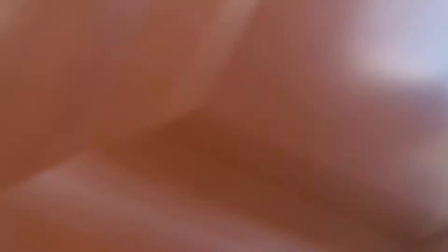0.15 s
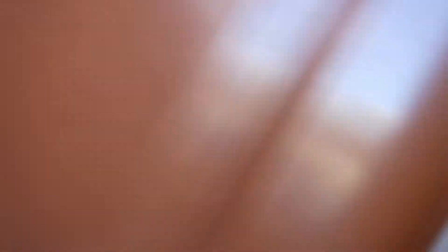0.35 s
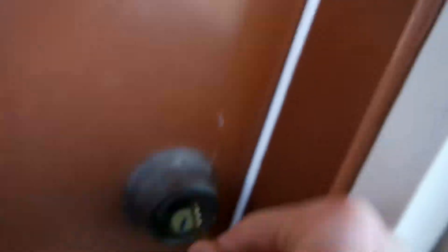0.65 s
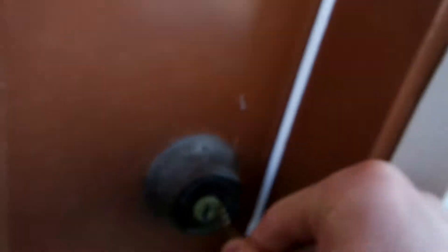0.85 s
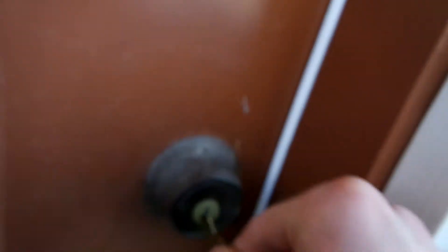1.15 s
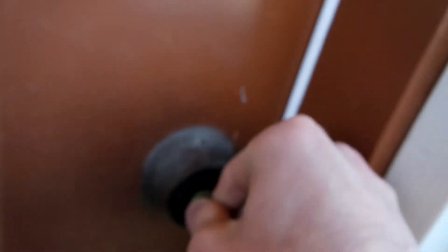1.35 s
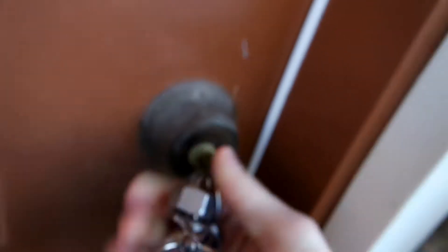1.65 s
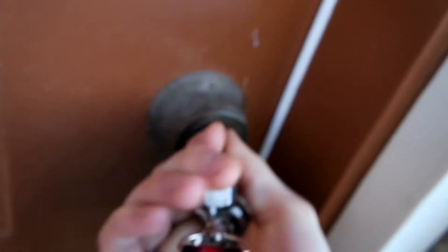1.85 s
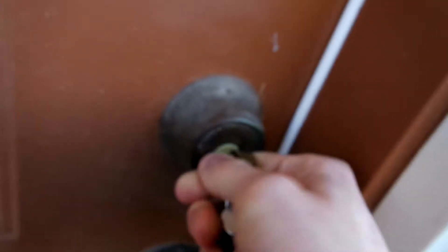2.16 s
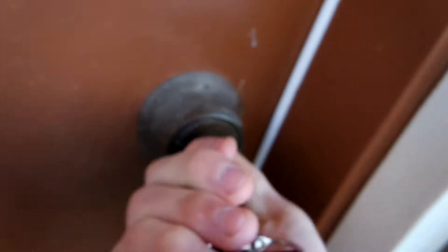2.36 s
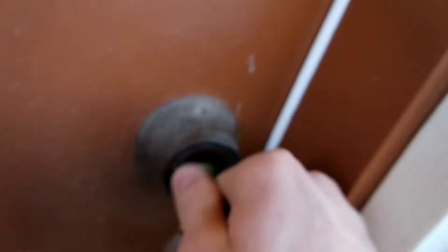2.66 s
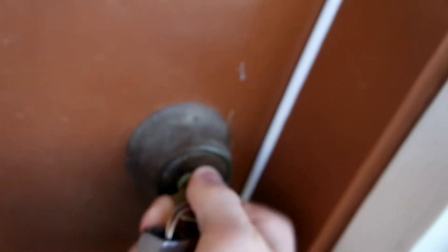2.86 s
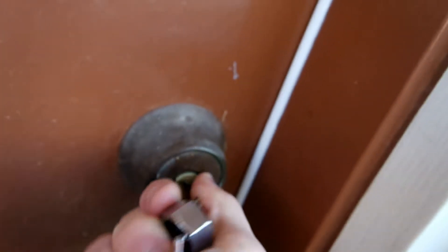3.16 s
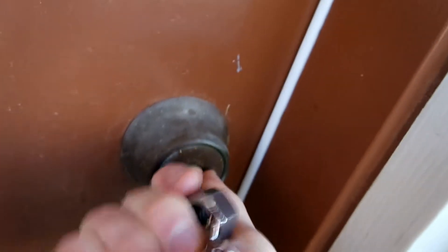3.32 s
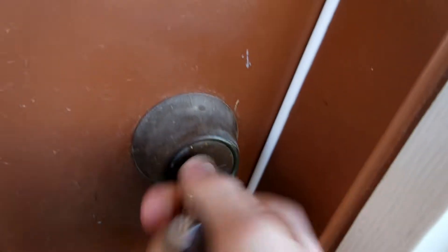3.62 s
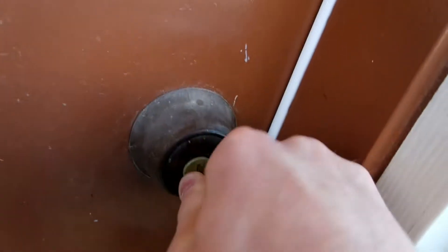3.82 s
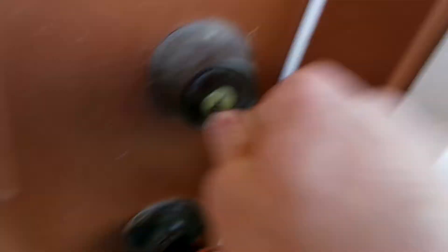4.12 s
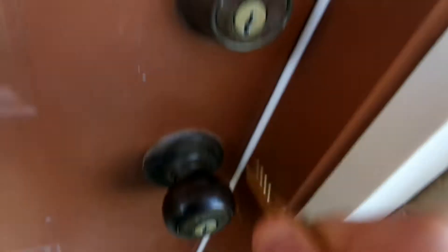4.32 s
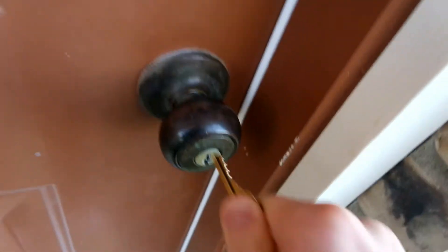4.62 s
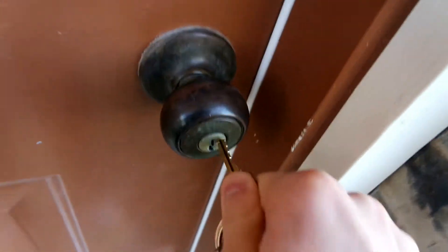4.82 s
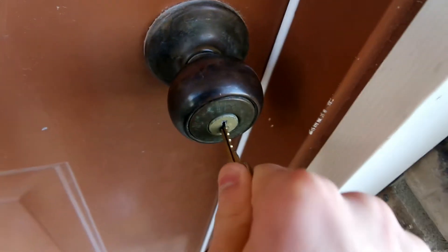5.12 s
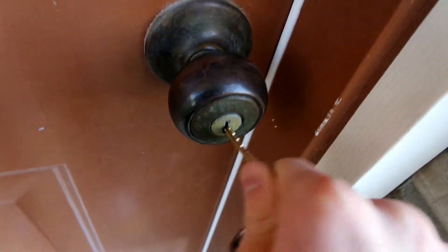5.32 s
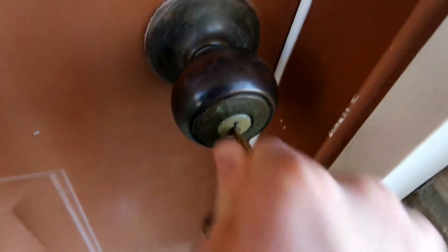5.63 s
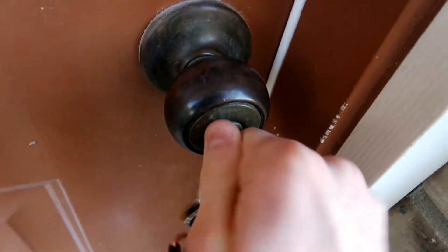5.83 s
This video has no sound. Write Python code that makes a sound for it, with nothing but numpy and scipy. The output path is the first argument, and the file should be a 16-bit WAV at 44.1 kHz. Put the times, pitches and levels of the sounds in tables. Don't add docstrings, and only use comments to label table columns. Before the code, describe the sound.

Close metallic clicking of a key worked in and out of a wooden door's lock, loose keys clinking, then a second key insertion below.

```python
import sys
import numpy as np
from scipy import signal
from scipy.fft import rfft, irfft, next_fast_len
from scipy.io import wavfile
from scipy.ndimage import uniform_filter1d

SR = 44100
rng = np.random.default_rng(int(sys.argv[2]) if len(sys.argv) > 2 else 0)


def field_ratio(decibels):
    return 10 ** (np.asarray(decibels, dtype=float) / 20)


def dump_mix(stems):
    frames = np.atleast_2d(stems).T
    limited = np.clip(frames, -1, 1)
    pcm = np.round(limited * 32767).astype(np.int16)
    wavfile.write(sys.argv[1], SR, pcm)


N = 263718

# start_s [s], peak_db [dB], pitch_hz [Hz]
THUDS = [(1.04, -27, 150), (1.224, -24, 140), (1.232, -22, 260), (1.242, -23, 400), (1.437, -14.5, 129),
         (2.082, -22, 88), (4.045, -12.5, 148), (4.1915, -12, 75), (4.399, -25, 59.3), (4.7, -21.5, 110),
         (4.729, -24, 70.7), (4.918, -18, 101.5), (5.153, -20.5, 84), (5.177, -23.5, 80),
         (5.211, -15.5, 85), (5.237, -20, 109.4), (5.368, -14.5, 130), (5.715, -16.5, 130)]
# time_s [s], level_db [dB]
FINGERS = [(0.0, -41), (0.51, -46), (0.85, -55.5), (1.13, -59.5), (1.32, -58), (1.73, -48.5), (1.86, -52.5),
           (2.41, -51.5), (2.81, -50), (2.9, -41), (3.01, -65), (3.16, -63.5), (3.78, -54.5), (4.31, -59),
           (5.7, -57.5), (5.98, -65.5)]
# mode_hz [Hz], width_hz [Hz], level_db [dB]
DOOR_MODES = [(140, 96, 0), (255, 93, 2.5), (413, 130, -0.5), (604, 156, -1.5), (805, 303, -9)]


def unit(x):
    return x / np.sqrt(np.mean(x ** 2) + 1e-20)


def along(points, hz):
    f, v = np.transpose(points)
    return np.interp(np.log(hz + 1), np.log(f + 1), v)


def curve(points):
    s, value = np.transpose(points)
    return np.interp(np.arange(N) / SR, s, value)


def wobble(rate_hz):
    knots = rng.standard_normal(int(N * rate_hz / SR) + 2)
    return np.interp(np.arange(N) * rate_hz / SR, np.arange(len(knots)), knots)


def filtered(x, response):
    m = next_fast_len(len(x) + 2048)
    spectrum = rfft(x, m) * response(np.fft.rfftfreq(m, 1 / SR))
    return irfft(spectrum, m)[:len(x)]


def resonance(f, hz, width_hz):
    return 1j * f * width_hz / (hz * hz - f * f + 1j * f * width_hz)


def modes(f, table):
    total = 0
    for k, (hz, width_hz, db) in enumerate(table):
        total = total + (-1) ** k * field_ratio(db) * resonance(f, hz, width_hz)
    return total


def tint(spectrum):
    return lambda hz: field_ratio(along(spectrum, hz))


def hiss(response, grit_db):
    grains = rng.standard_normal(N) * field_ratio(grit_db * wobble(350))
    return unit(filtered(grains, response))


def add(track, start_s, sound, peak_db):
    part = track[max(round(start_s * SR), 0):][:len(sound)]
    part += field_ratio(peak_db) * sound[:len(part)] / np.abs(sound).max()


def contact(t60_s, spike):
    t = np.arange(SR // 12) / SR
    bounce_db = 3.3 * np.repeat(rng.standard_normal(len(t) // 64 + 1), 64)[:len(t)]
    envelope = field_ratio(bounce_db - 60 * t / max(t60_s, 0.003)) * (1 - np.exp(-t / 0.00031))
    chatter = rng.standard_normal(len(t)) * envelope
    chatter[4] += spike
    return chatter


def background():
    # time_s [s], level_db [dB]
    grip = [(0.0, -56), (0.01, -37), (0.98, -40), (1.46, -32), (1.58, -39.5), (1.83, -33), (3.01, -31),
            (3.08, -43), (3.98, -30.5), (4.21, -28.5), (4.28, -39), (4.58, -37), (4.71, -32), (5.08, -32.5),
            (5.21, -33.5), (5.33, -41), (5.36, -27.5), (5.98, -40.5)]
    # freq_hz [Hz], density_db [dB per Hz]
    rumble_spectrum = [(10, -36), (18, -2), (35, 0), (80, -1.5), (130, -7), (250, -16.5), (330, -29.5),
                       (500, -66)]
    # freq_hz [Hz], density_db [dB per Hz]
    hall_spectrum = [(90, -34), (150, -8), (260, -0.5), (345, -9), (550, -6.5), (800, -12), (1200, -12.5),
                     (1850, -25), (4000, -34), (8500, -37), (15200, -41)]
    jolt_db, jolt_width_s, jolt_lag_s = -17.5, 0.014, 0.021
    t = np.arange(N) / SR
    grip_db = curve(grip)
    rumble_level = field_ratio(grip_db - 0.5 + 1.9 * wobble(22))
    for s, db, _ in THUDS:
        rumble_level += field_ratio(db + jolt_db) * np.exp(-((t - s - jolt_lag_s) / jolt_width_s) ** 2)
    rumble = rumble_level * hiss(tint(rumble_spectrum), grit_db=1.6)
    air_db = -15 + 0.51 * grip_db + 0.25 * curve(FINGERS)
    air = field_ratio(air_db + 0.61 * wobble(8)) * hiss(tint(hall_spectrum), grit_db=0.3)
    return rumble + air


def friction():
    # start_s [s], top_s [s], end_s [s], level_db [dB]
    shuffles = [
        (.01, 0.052, 0.1, -35.5),
        (0.252, .35, 0.82, -53),
        (0.505, 0.579, 0.64, -34.5),
        (0.635, 0.667, .75, -44),
        (4.44, 4.515, 4.56, -55.5),
    ]
    # start_s [s], top_s [s], end_s [s], level_db [dB]
    twists = [(1.33, 1.43, 1.485, -32), (1.61, 1.623, 1.675, -36.5), (1.668, 1.765, 1.77, -43),
              (1.82, 1.861, 1.95, -49), (2.0, 2.038, 1.96, -43), (2.07, 2.098, 2.23, -50.5),
              (2.296, 2.417, 2.36, -45.5), (2.562, 2.6, 2.72, -38), (3.424, 3.432, 3.475, -36.5),
              (3.58, 3.672, 3.8, -61), (3.693, 3.738, 3.87, -50), (3.8, 3.847, 3.95, -50),
              (4.042, 4.054, 4.1, -26), (4.071, 4.096, 4.05, -33.5), (4.191, 4.211, 4.28, -29),
              (5.64, 5.736, 5.72, -37.5), (2.368, 2.4, 2.43, -47), (2.02, 2.034, 2.05, -43)]
    # start_s [s], top_s [s], end_s [s], level_db [dB], door_db [dB]
    grinds = [
        (1.214, 1.236, 1.316, -43.5, -28.5),
        (1.273, 1.28, 1.39, -48, -40),
        (2.74, 2.76, 2.85, -49, -39),
        (2.8, 2.864, 2.87, -42.5, -39),
        (5.052, 5.123, 5.32, -65, -43.5),
        (5.439, 5.45, 5.52, -75, -34),
        (5.603, 5.74, 5.42, -32, -32),
        (5.96, 5.967, 6.25, -30, -28),
    ]
    # freq_hz [Hz], density_db [dB per Hz]
    skin_spectrum = [(880, -43), (1500, -15), (3450, -9), (5390, -5), (7710, -6.5), (8750, -3),
                     (12500, -4.5), (14100, 0.5), (15200, 0.5)]
    # freq_hz [Hz], density_db [dB per Hz]
    blade_spectrum = [(500, -40), (900, -12.5), (1400, 0), (2000, -3), (3000, -5), (4500, -8.5),
                      (6500, -20), (15000, -33)]
    shuffle_db, twist_db, grind_skin_db = np.array([2.5, -14.5, -20]), np.array([1, -1, 2.6]), -16

    strokes = [(*when, db + shuffle_db) for *when, db in shuffles]
    strokes += [(*when, db + twist_db) for *when, db in twists]
    strokes += [(*when, [db + grind_skin_db, db, door_db]) for *when, db, door_db in grinds]

    fingers_db = curve(FINGERS)
    effort = np.array([field_ratio(fingers_db - 3.5), field_ratio(0.64 * fingers_db - 24), np.zeros(N)])
    slips = field_ratio(2.64 * wobble(130))
    for start_s, top_s, end_s, db in strokes:
        span = np.arange(round(start_s * SR), min(round(end_s * SR), N))
        swell = np.interp(span / SR, [start_s, top_s, end_s], [0, 1, 0]) ** 1.07
        effort[:, span] += field_ratio(db)[:, None] * swell * slips[span]
    skin = hiss(tint(skin_spectrum), grit_db=3.5)
    blade = hiss(tint(blade_spectrum), grit_db=2.5)
    door = hiss(lambda f: modes(f, DOOR_MODES), grit_db=1.5)
    return np.sum(effort * [skin, blade, door], axis=0)


def ticks():
    # start_s [s], peak_db [dB], brightest_hz [Hz]
    approach = [(0.0194, -30, 14700), (0.058, -11, 14700), (0.0907, -19.5, 13700), (0.1264, -23.5, 10900),
                (0.2449, -13, 6130), (0.2907, -21, 14600), (0.3037, -22, 14900), (0.3282, -24, 14900),
                (0.347, -22, 14400), (0.383, -21, 13200), (0.7881, -17, 7550), (0.9218, -36.5, 5000),
                (1.0366, -33, 5000), (1.0615, -27, 6300), (1.1757, -40, 8620), (1.2381, -34, 6840),
                (1.282, -27, 6060)]
    # start_s [s], peak_db [dB], brightest_hz [Hz]
    turning = [(1.6126, -25, 8200), (1.6818, -20, 13200), (1.733, -25, 12300), (1.7496, -14, 15200),
               (1.7727, -24, 6750), (1.8392, -30, 13500), (1.8656, -25.5, 5200), (1.9061, -26, 11600),
               (1.977, -27, 6630), (2.0058, -22, 14800), (2.03, -21, 14700), (2.077, -30, 14200),
               (2.0877, -21.5, 11600), (2.1064, -26, 10000), (2.1435, -31, 14500), (2.2847, -42, 14700),
               (2.342, -30, 14700), (2.3765, -34, 14900), (2.386, -20, 14700), (2.5187, -34, 12100)]
    # start_s [s], peak_db [dB], brightest_hz [Hz]
    throwing = [(2.581, -8, 15800), (2.611, -21, 10200), (2.6529, -19, 14600), (2.6788, -18.5, 5030),
                (2.7443, -29, 5170), (2.764, -24, 12100), (2.8193, -18, 12200), (2.8828, -36, 14900),
                (2.9013, -22, 14700), (2.9204, -24, 13100), (2.9456, -14, 7800), (2.981, -28, 13500),
                (3.0128, -10.5, 5100), (3.057, -42, 11800), (3.268, -19, 6440), (3.4236, -4, 11200),
                (3.5743, -25, 13800), (3.7083, -31, 6500), (3.7165, -27, 11000), (3.7449, -16, 13600),
                (3.7824, -28, 12500), (3.8034, -22, 12800), (3.8302, -27, 14000), (3.838, -18.5, 13800),
                (3.9394, -31, 12200)]
    # start_s [s], peak_db [dB], brightest_hz [Hz]
    leaving = [(4.337, -35, 8790), (4.47, -30.5, 14100), (4.519, -34, 11300), (4.6096, -31, 9700),
               (4.63, -32, 14300), (4.9278, -43, 5310), (5.1272, -30.5, 5130), (5.4286, -33, 13700),
               (5.448, -20.5, 12200), (5.4574, -31, 14100), (5.5154, -41, 14000), (5.5544, -31, 11300),
               (5.823, -46, 9000), (5.839, -42, 14000), (5.858, -48, 10000), (5.949, -43, 9000),
               (5.904, -36, 11300), (5.9194, -38, 13500), (5.9618, -4, 11200)]
    # start_s [s], peak_db [dB]
    pins = [(1.2451, -25), (1.2682, -20), (1.3462, -25), (1.3611, -9.5), (1.372, -24), (1.3826, -20),
            (1.3857, -11), (1.4042, -17), (1.4075, -15), (1.4388, -13), (1.4242, -11), (1.4412, -9),
            (4.0475, -10), (4.0542, -2), (4.0894, -11.5), (4.1969, -13), (4.204, -11), (4.2138, -6),
            (4.2255, -10), (4.2362, -8), (4.2474, -4), (5.655, -22), (5.6765, -16), (5.6884, -24),
            (5.7004, -15), (5.7107, -17), (5.7214, -22), (5.7285, -19), (5.733, -21), (5.74, -18),
            (5.7482, -14), (5.753, -17), (5.7615, -11)]
    pin_hz, pin_low_hz, tick_t60_s = 12880, 4700, 0.016

    hits = [(s, db, hz, 0) for s, db, hz in approach + turning + throwing + leaving]
    for s, db in pins:
        low = 1.4 if s > 5 else 0
        hits.append((s, db, pin_hz * (1 + 0.044 * rng.standard_normal()), low))

    out = np.zeros(N)
    for s, db, hz, low in hits:
        def colour(f):
            part = resonance(f, hz, 1800) + low * resonance(f, pin_low_hz, 1260)
            port = 0.5 * resonance(f, 14700, 1100)
            wide = 0.29 * resonance(f, 9000, 14000)
            return (part + port + wide) * resonance(f, 11300, 17600)

        t60_s = tick_t60_s * (1 + max(db + 11.5, 0) / 30)
        add(out, s + 0.0004, filtered(contact(t60_s, spike=3.6), colour), db + 3.2)
    return out


def knocks():
    # start_s [s], peak_db [dB], loudest_hz [Hz], panel_db [dB]
    bolt = [(0.788, -36, 1010, -24), (0.922, -33.5, 1150, -41), (1.038, -20, 1880, -20.5),
            (1.062, -13.5, 1820, -21), (1.176, -28.5, 1660, -37), (1.224, -31, 1210, -27),
            (1.285, -14.5, 1870, -28), (1.337, -22.5, 1750, -26), (1.4415, -11, 1880, -16.5),
            (1.895, -29, 1580, -31), (2.007, -20.5, 1750, -27), (2.392, -22, 1752, -30.5),
            (2.588, -25, 1750, -32), (2.792, -25.5, 1600, -35), (2.853, -24, 1342, -28),
            (2.9465, -11, 1150, -18), (3.012, -7.5, 4150, -15.5), (3.219, -36, 2260, -41),
            (3.4234, -5, 2420, -14.5), (3.424, -6.5, 4200, -25.5), (3.428, -13.5, 1060, -25),
            (3.646, -33.5, 1590, -35.5), (3.719, -27.5, 1840, -33), (3.894, -30.5, 1730, -38),
            (4.047, -10.5, 1620, -20.5), (4.054, -12, 2600, -22.5), (4.0945, -15, 3410, -16),
            (4.199, -22, 2610, -19.5)]
    # start_s [s], peak_db [dB], loudest_hz [Hz], panel_db [dB]
    knob = [(4.927, -29.5, 1350, -28.5), (5.015, -38, 1520, -31.5), (5.127, -26.5, 1353, -34),
            (5.449, -19, 1630, -17.5), (5.515, -33, 1020, -28.5), (5.556, -27.5, 1230, -27.5),
            (5.655, -31, 1350, -22.5), (5.677, -28, 1030, -23.5), (5.7, -20.5, 1010, -26),
            (5.742, -18.5, 1750, -20), (5.7615, -22, 4410, -19.5), (5.839, -37, 1710, -43),
            (5.962, -14, 1920, -22.5), (5.965, -18, 1090, -24), (5.633, -36, 1200, -23.5)]
    # start_s [s], peak_db [dB], loudest_hz [Hz]
    loose = [
        (0.244, -28.5, 4200),
        (1.62, -15, 3500),
        (2.745, -16.5, 2620),
        (3.2703, -10, 2470),
        (3.2728, -9, 2343),
        (3.852, -20, 3680),
        (4.248, -17, 2610),
        (4.2495, -14, 1750),
    ]
    # mode_hz [Hz], width_hz [Hz], level_db [dB]
    lock_modes = [(1150, 380, -2), (1750, 446, 0), (2600, 420, -1), (4200, 720, -5), (5950, 1300, -10.5)]
    t60_s, loose_panel_db = 0.066, -23

    out = np.zeros(N)
    for s, db, hz, panel_db in bolt + knob + [(s, db, hz, db + loose_panel_db) for s, db, hz in loose]:
        body = filtered(contact(t60_s, spike=10.9), lambda f: modes(f, lock_modes) * resonance(f, 1880, 7000))
        part_t60_s = t60_s * min(1.2, 1800 / hz)
        part = filtered(contact(part_t60_s, spike=11.2),
                        lambda f: resonance(f, hz, 370) * resonance(f, hz, 3700))
        panel = filtered(contact(1.45 * t60_s, spike=7.9), lambda f: modes(f, DOOR_MODES))
        add(out, s + 0.0003, 0.57 * body + 1.2 * part, db - 0.3)
        add(out, s + 0.00033, panel, panel_db)
    return out


def rings():
    # start_s [s], pitch_hz [Hz], peak_db [dB], t60_s
    # [s]
    free_keys = [(.789, 4980, -35.5, 0.037), (.789, 7600, -44, .06), (1.3615, 13100, -20, .025),
                 (1.386, 13200, -20, 0.022), (1.405, 13100, -29, .04), (3.414, 6400, -41, .06),
                 (1.442, 3200, -24, 0.04), (1.46, 3340, -38, .12), (1.62, 3630, -20, 0.056),
                 (1.62, 8079, -31, 0.058), (3.015, 4320, -36, .1), (3.013, 6840, -38, 0.15),
                 (3.02, 5000, -47, .15), (3.292, 6465, -28, .05), (3.3, 6490, -54, 0.82),
                 (3.285, 12700, -43, 0.1), (3.853, 3715, -25.5, 0.075), (4.056, 8300, -30, 0.15),
                 (4.09, 13100, -36, .08), (4.1, 12100, -44, .1), (4.34, 8770, -47.5, 0.088)]
    out, t = np.zeros(N), np.arange(SR // 8) / SR
    for s, hz, db, t60_s in free_keys:
        sway_rad = np.cumsum(rng.standard_normal(len(t))) * 0.12
        envelope = field_ratio(-60 * t / t60_s) * (1 - np.exp(-t / 0.0017))
        add(out, s, np.sin(2 * np.pi * hz * t + sway_rad) * envelope, db)
    return out


def thuds():
    out, t = np.zeros(N), np.arange(SR // 6) / SR
    for s, db, hz in THUDS:
        envelope = field_ratio(-60 * t * hz / 3.6) * (1 - np.exp(-t / 0.0013))
        add(out, s, np.sin(2 * np.pi * hz * t) * envelope, db)
    return out


def snaps():
    # start_s [s], peak_db [dB], centre_hz [Hz], t60_s [s], sign [push 1, pull -1]
    cracks = [
        (1.0617, -12, 4000, .004, 1),
        (1.4414, -4, 3500, .008, 1),
        (2.581, -3.5, 11000, .002, 1),
        (2.9464, -7, 3500, .003, -1),
        (3.0126, -3.5, 4500, .003, -1),
        (4.0943, -9, 1200, .003, -1),
        (5.7624, -4, 6000, .008, 1),
        (4.2482, -11, 6000, .006, 1),
        (3.2685, -18, 9000, .006, 1),
        (5.449, -19, 6000, .004, 1),
    ]
    out = np.zeros(N)
    for s, db, hz, t60_s, sign in cracks:
        crack = filtered(contact(t60_s, spike=6.5),
                         lambda f: resonance(f, hz, 2.5 * hz) * resonance(f, hz, 1.6 * hz))
        add(out, s, sign * crack, db)
    return out


def rattles():
    # start_s [s], peak_db [dB], pitch_hz [Hz], t60_s [s]
    parts = [(1.347, -29, 1740, .03), (1.375, -27, 1900, .03), (1.396, -28, 3420, .02),
             (1.407, -24, 3010, .03), (1.408, -26, 5800, .03), (1.423, -23, 2410, .03),
             (1.443, -14, 1820, .03), (1.446, -18, 3000, .03), (2.387, -33, 4300, .1),
             (2.39, -33, 2700, .1), (2.542, -35, 1900, .03), (2.6, -30, 2600, .03), (2.67, -32, 2800, .03),
             (2.69, -31, 1800, .03), (2.76, -29, 2500, .02), (2.808, -31, 1460, .04),
             (2.82, -33, 3500, .015), (2.836, -28, 1500, .09), (2.862, -27, 2000, .05),
             (2.902, -32, 1700, .04), (2.921, -36, 4200, .012), (3.28, -22, 2500, .04),
             (3.429, -14, 2600, .04), (1.442, -13, 11400, .015), (4.0545, -9, 13000, .015),
             (4.056, -16, 9000, .02), (4.109, -31, 9600, .015), (4.115, -30, 9600, .015),
             (4.2485, -11, 12000, .02), (5.762, -11, 11000, .01), (2.947, -15, 1100, .05),
             (3.014, -19, 4250, .07), (4.044, -26, 2600, .03), (4.048, -20, 6000, .012),
             (4.049, -21, 1640, .08), (4.089, -26, 6800, .03), (4.225, -26, 3500, .03),
             (4.237, -26, 2700, .04), (4.249, -17, 2600, .035), (4.49, -43, 2650, .08),
             (4.49, -48, 4950, .06), (4.56, -51, 4250, .06), (5.09, -40, 1550, .1), (5.132, -37, 1550, .12),
             (5.13, -41, 3800, .05), (5.656, -30, 1400, .09), (5.677, -29, 4660, .03),
             (5.689, -30, 4800, .015), (5.7005, -22, 4650, .012), (5.709, -24, 4900, .025),
             (5.709, -24, 1340, .05), (5.722, -28, 4000, .012), (5.732, -31, 6000, .02),
             (5.75, -22, 1410, .04), (5.779, -36, 6400, .012)]
    out = np.zeros(N)
    for s, db, hz, t60_s in parts:
        rattle = filtered(contact(t60_s, spike=4.5),
                          lambda f: resonance(f, hz, 150 + 0.1 * hz) * resonance(f, hz, 600 + 0.4 * hz))
        add(out, s, rattle, db)
    return out


def squeak():
    # top_s [s], pitch_hz [Hz], peak_db [dB], rise_s [s], sag_s [s], choke_s [s], octave_db [dB]
    cylinder = (3.2845, 6460, -3.5, 0.0038, 0.0042, 0.006, -19)
    top_s, hz, db, rise_s, sag_s, choke_s, octave_db = cylinder
    t = np.arange(N) / SR - top_s
    choked = 1 + np.exp(np.clip((t - choke_s) / 0.0005, -50, 50))
    after = np.exp(-np.abs(t / sag_s)) / choked
    swell = np.where(t < 0, np.exp(-np.abs(t / rise_s) ** 1.5), after)
    tone = swell * np.sin(2 * np.pi * hz * t)
    octave = field_ratio(octave_db) * swell ** 2 * np.sin(2 * np.pi * 2 * hz * t)
    return field_ratio(db) * (tone + octave)


def hallway(x):
    # freq_hz [Hz], t60_s [s]
    walls = [(200, 0.48), (2000, 0.12), (10000, 0.052)]
    hz, t, z = signal.stft(rng.standard_normal(SR // 3), SR, nperseg=256)
    decay = field_ratio(-60 * t / along(walls, hz)[:, None])
    tail = signal.istft(z * decay, SR, nperseg=256)[1]
    return signal.fftconvolve(np.pad(x, (200, 0)), tail / np.linalg.norm(tail))[:N]


def scene():
    metal = ticks() + knocks() + rings() + squeak() + snaps() + rattles()
    return (metal + field_ratio(-17.5) * hallway(metal) + thuds() + friction() + background())[None]


def starved(x):
    # centre_s [s], length_s [s], above_hz [Hz]
    dropouts = [(1.712, .012, 2500), (2.035, .016, 6500), (2.41, .012, 2000), (3.037, .026, 5300),
                (3.411, .012, 2000), (3.688, .018, 2200), (4.035, .01, 2500), (4.36, .014, 2000),
                (4.499, .014, 1000), (4.568, .014, 2400), (5.36, .016, 2500)]
    sink_db, kept_over_db = -18, 1.8
    hz, t, z = signal.stft(x, SR, nperseg=256, noverlap=192)
    gain = np.ones(z.shape)
    for s, length_s, above_hz in dropouts:
        now = np.abs(t - s) < length_s / 2
        power = uniform_filter1d(np.mean(np.abs(z[:, now]) ** 2, axis=1), size=3)
        nearby = uniform_filter1d(power, size=15)
        weak = (hz > above_hz) & (power < field_ratio(2 * kept_over_db) * nearby)
        gain[np.ix_(weak, now)] = field_ratio(sink_db)
    return signal.istft(z * gain, SR, nperseg=256, noverlap=192)[1][:N]


def band_limit(x):
    return signal.sosfilt(signal.butter(12, 16440, fs=SR, output="sos"), x)


def record(dry):
    edge_hz, edge_db = [15000, 15250, 16400, 16500], [0, -28, -33, -70]
    band = filtered(dry[0], lambda hz: field_ratio(np.interp(hz, edge_hz, edge_db)))
    band = band / (1 + np.abs(band / 0.87) ** 4) ** (1 / 4)
    return band_limit(starved(band)[None])


dry = scene()
out = record(dry)
dump_mix(out)
```